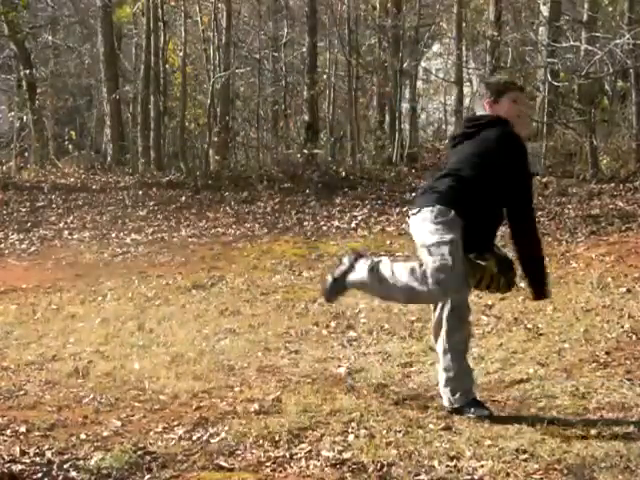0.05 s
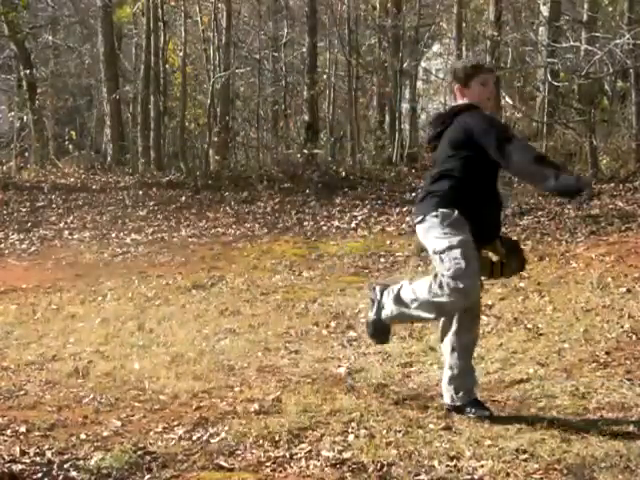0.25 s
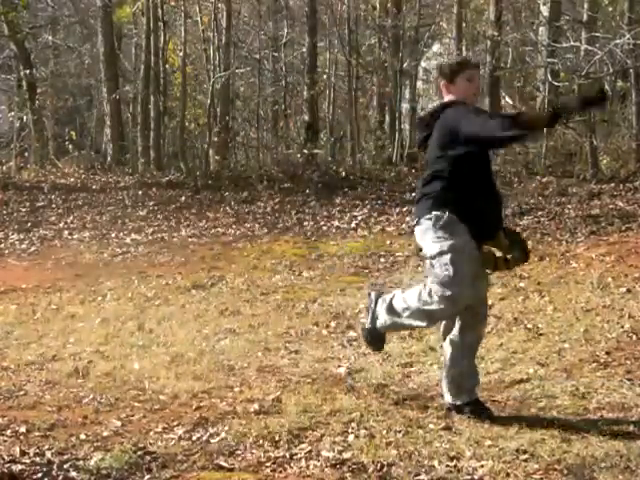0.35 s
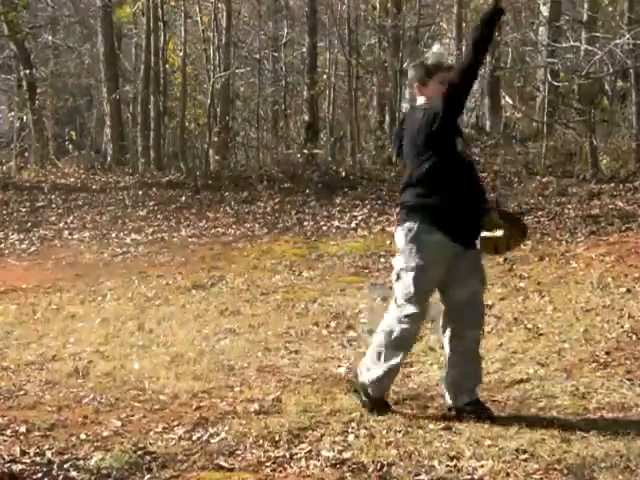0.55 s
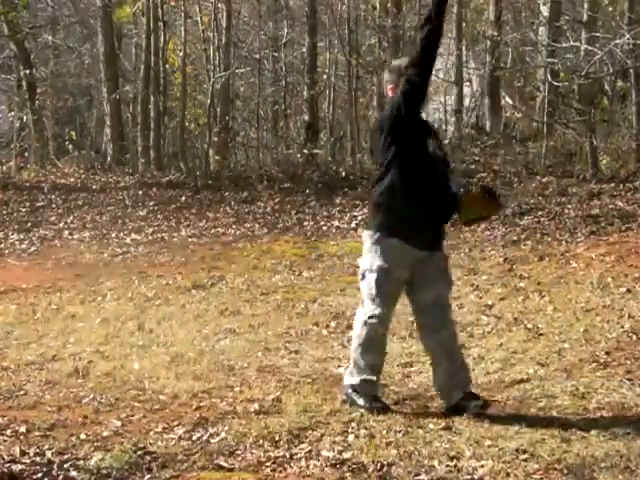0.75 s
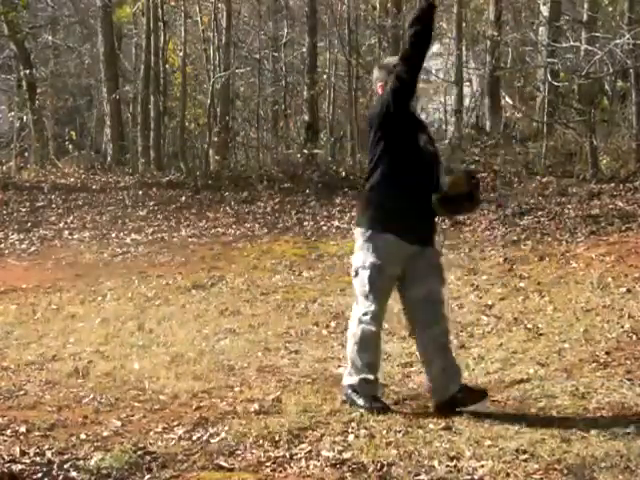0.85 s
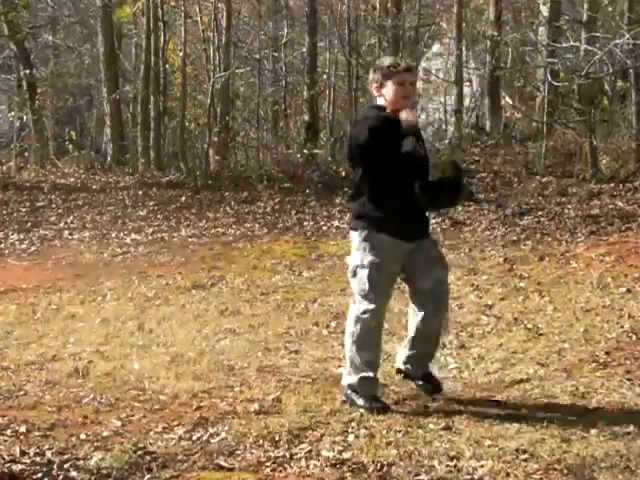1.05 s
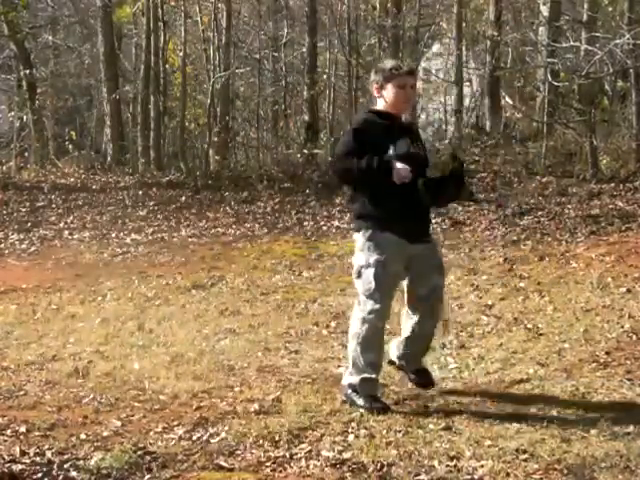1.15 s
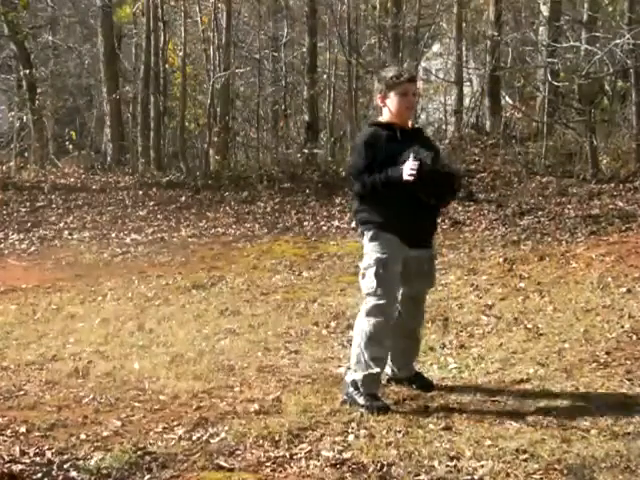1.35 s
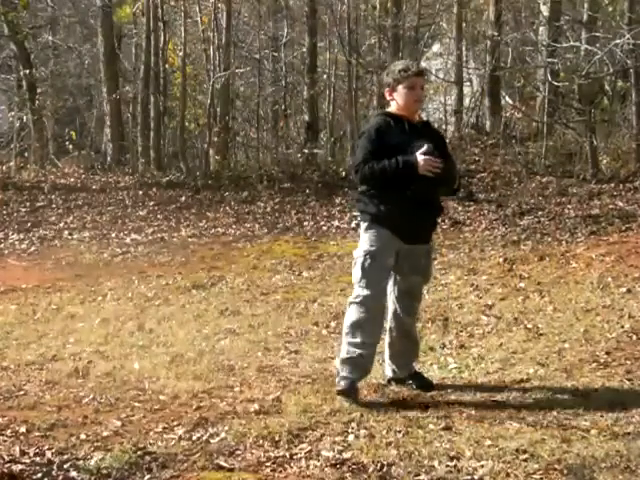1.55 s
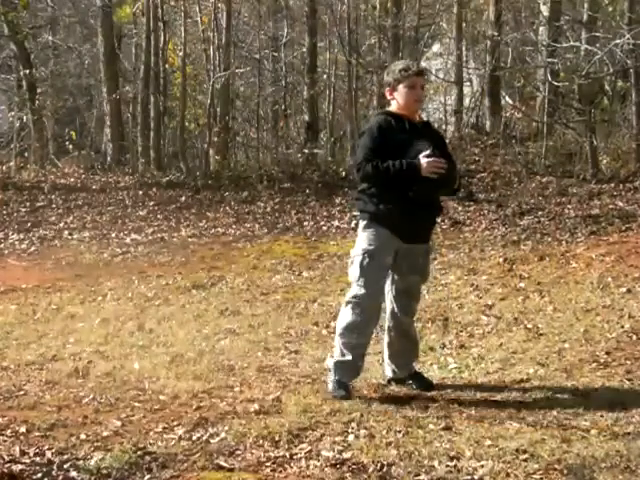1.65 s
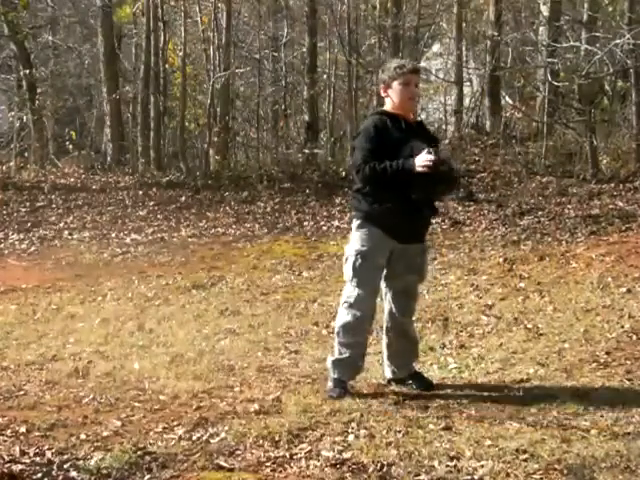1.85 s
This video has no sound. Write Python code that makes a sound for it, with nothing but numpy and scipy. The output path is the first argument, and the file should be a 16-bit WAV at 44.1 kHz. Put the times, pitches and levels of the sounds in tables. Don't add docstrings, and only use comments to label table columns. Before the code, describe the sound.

After a tiny bird chip, a caught ball pops sharply in a leather mitt, close and loud. Bright echoes scatter through woods, then quiet leaf ticks and another chip, over soft distant traffic, picked up by spaced microphones.

```python
import sys
import numpy as np
from scipy import signal
from scipy.fft import rfft, irfft
from scipy.io import wavfile
from scipy.ndimage import uniform_filter1d

SR = 44100
rng = np.random.default_rng(int(sys.argv[2]) if len(sys.argv) > 2 else 0)


def wav_record(signal):
    frames = np.transpose(np.atleast_2d(signal))
    bounded = np.clip(frames, -1, 1)
    quanta = np.round(bounded * 32767).astype(np.int16)
    wavfile.write(sys.argv[1], SR, quanta)


def undo_db(level):
    steps = np.asarray(level, float) / 20
    return 10 ** steps


N = 83790
T = np.arange(N) / SR
SHORT = T[:SR // 6]


def level(x, db):
    return x * undo_db(db) / np.sqrt(np.mean(x ** 2))


def band(x, lo_hz, hi_hz, order=2):
    sos = signal.butter(order, [lo_hz, min(hi_hz, SR / 2.2)], "band", fs=SR, output="sos")
    return signal.sosfilt(sos, x)


def walk(rate):
    k = int(SR / rate)
    held = np.repeat(rng.standard_normal(N // k + 1), k)
    return 1.3 * uniform_filter1d(uniform_filter1d(held, k), k)[:N]


def fade(t, t60):
    return (t >= 0) * np.exp(-np.log(1000) * np.clip(t / t60, 0, 3))


def late(x, s):
    return np.interp(T - s, T, x, left=0)


def add(out, x, s):
    i = int(s * SR)
    out[..., i:i + x.shape[-1]] += x[..., :N - i]


def ports(x, share, lag):
    wide_hz, order, top_hz = 3030, 1.47, 7000
    f = np.arange(N // 2 + 1) * SR / N
    wide = (f / wide_hz) ** order / (1 + (f / top_hz) ** order)
    side = irfft(rfft(x) * (share - 1j * lag * wide), N)
    return np.array([x, side])


# f/Hz, level/dB
AIR_MID_TONE = [(25, -2), (66, 0), (235, -10.5), (492, -18), (800, -22.5), (2100, -33.5), (8530, -45.5),
                (11000, -47)]
AIR_SIDE_TONE = [(25, 7.5), (197, 1.5), (505, -3.5), (1000, -6), (1670, -9.5), (3680, -12), (8970, -17),
                 (11000, -38)]
# t/s, level/dB
RUMBLE_LEVELS = [(0, -51.5), (.2, -57), (.57, -52.5), (.8, -51.5), (1.05, -53), (1.35, -55.5), (1.9, -56.5)]


def air(colour, db, swell):
    swell_db, flicker_db, rumble_hz = .6, 1.2, 404
    f, tone = np.array(colour).T
    s, far = np.array(RUMBLE_LEVELS).T
    rumble = np.interp(T, s, far) - far.mean()
    out = 0
    for hz in 25 * 2 ** np.arange(0, 9, .5):
        unrest = swell_db * swell + flicker_db * walk(9)
        gain_db = np.interp(np.log(hz), np.log(f), tone) + unrest * min(1, (300 / hz) ** 0.55)
        gain_db = gain_db + rumble / (1 + (hz / rumble_hz) ** 2)
        noise = band(rng.standard_normal(N), hz / 1.19, hz * 1.19, order=3)
        out = out + undo_db(gain_db) * noise
    return level(out, db)


# t/s, level/dB, extra side level/dB
CHIPS = [
    (0.12, -68, 9),
    (1.156, -64, 7),
]


def bird():
    top_hz, rise_hz, rise_s = 8050, 2200, .007
    sag_hz_per_s, rough_hz = 30000, 130
    chip_s, tail_db, tail_s = .045, -12, .11
    out, t = np.zeros((2, N)), SHORT
    for s, db, side_db in CHIPS:
        husk = walk(900)[:len(t)]
        hz = top_hz - rise_hz * np.exp(-t / rise_s) - sag_hz_per_s * t + rough_hz * husk
        gate = np.clip(np.minimum(t / .003, 1 - t / chip_s), 0, 1)
        chip = np.sin(2 * np.pi * np.cumsum(hz) / SR) * gate
        scatter = rng.standard_normal((2, len(t))) * np.clip(1 - (t / tail_s) ** 2, 0, 1)
        tail = level(signal.fftconvolve(chip[None], scatter)[:, :len(t)], tail_db)
        both = chip * np.array([[1], [-1]]) + tail
        add(out, undo_db(np.array([[db], [db + side_db]])) * both, s)
    return out


# t/s, length/s, level/dB, centre f/Hz, width ratio
RUSTLES = [
    (0.479, 0.0073, -63, 2000, 1.23),
    (0.528, 0.059, -69, 2580, 2.84),
    (.668, 0.0066, -65, 3120, 1.18),
    (0.924, .035, -67, 1260, 1.47),
    (1.395, 0.0048, -59.5, 1700, 1.5),
    (1.47, 0.0046, -60.5, 2540, 1.33),
    (1.649, 0.095, -64.5, 1980, 2.07),
    (1.733, 0.0055, -55.5, 3020, 1.16),
    (1.797, 0.0053, -64.5, 3300, 2.2),
]


def leaves():
    cracks_per_s, uneven_db = 9000, 2.5
    out, t = np.zeros((2, N)), SHORT
    for s, length, db, hz, ratio in RUSTLES:
        cracks = (rng.random((2, len(t))) < cracks_per_s / SR) * rng.standard_normal((2, len(t)))
        cracks = cracks * undo_db(uneven_db * rng.exponential(size=cracks.shape))
        gate = np.clip(np.minimum(t, length - t) / (0.47 * length), 0, 1)
        ratio = max(ratio, 1.05)
        burst = band(cracks * gate, hz / ratio, hz * ratio, order=3)
        burst = level(burst, db) * np.sqrt(length / t[-1])
        add(out, burst * np.array([[1], [.8]]), s)
    return out


# f/Hz, width ratio, mid level/dB, side level/dB, t60/s
TRUNKS = [(162, 1.424, -53.5, -91, .2), (293, 1.42, -57, -72, 0.083), (597, 1.4, -45.5, -67, 0.54),
          (1110, 1.66, -56, -65, 1.23), (2210, 1.83, -53.5, -68, 0.5), (3135, 1.09, -60.5, -66, 1.62),
          (4620, 1.61, -55, -54.5, 0.52), (6850, 1.126, -61.5, -56, 0.55), (8970, 1.09, -64, -56.5, 0.27)]


def trees():
    pop_s, rise_s, uneven_db = .216, 0.0014, 3
    early_db, early_t60_s = 2, 0.26
    settled = slice(SR // 40, SR // 4)
    out, t = np.zeros((2, N)), T[:SR]
    for hz, ratio, mid_db, side_db, t60 in TRUNKS:
        grains = rng.standard_normal((2, SR)) * undo_db(uneven_db * rng.exponential(size=(2, SR)))
        decay = fade(t, t60) + undo_db(early_db) * fade(t, early_t60_s)
        onset = 1 - np.exp(-(t / rise_s) ** 2)
        ratio = max(ratio, 1.02)
        wet = band(grains * decay * onset, hz / ratio, hz * ratio, order=3)
        wet = wet / wet[:, settled].std(axis=1, keepdims=True)
        add(out, wet * undo_db(np.array([[mid_db], [side_db]])), pop_s)
    return out


ECHO_DELAYS = [.00285, .0100, .0209, .0624, .0873, .1745, .4994]
# level/dB, low edge f/Hz, high edge f/Hz, left share
ECHO_TONES = [
    (-8.5, 92, 1700, 0.089),
    (-17.5, 50, 820, .1),
    (-8, 1800, 7500, 0.076),
    (-25.5, 910, 7100, 0.091),
    (-16, 1900, 3700, 0.065),
    (-12, 3620, 8900, -0.41),
    (-22.5, 3000, 6200, -.12),
]


def echoes(pop):
    out = np.zeros((2, N))
    for s, (db, lo_hz, hi_hz, share) in zip(ECHO_DELAYS, ECHO_TONES):
        out += ports(undo_db(db) * band(late(pop, s), lo_hz, hi_hz), share, .6)
    return out


def ring(x, modes):
    tones = 0
    for hz, db, t60 in modes:
        tones = tones + undo_db(db) * np.cos(2 * np.pi * hz * SHORT) * fade(SHORT, t60)
    return signal.fftconvolve(x, tones)[:N]


TOUCH_TIMES = [
    .21645,
    .2176,
]
# level/dB, push length t/ms
TOUCHES = [
    (-11.5, .22),
    (0, .45),
]
# f/Hz, level/dB, t60/s
POCKET_TONES = [(173, -4, 0.097), (276, 11.5, 0.02), (491, 10, 0.034), (590, 6, 0.015), (694, 8.5, 0.014),
                (1004, -5.5, 0.056), (1643, -14, 0.011)]
# f/Hz, level/dB, t60/s
LACE_TONES = [(3193, -6, 0.027), (3760, 7.5, 0.0027), (4860, -3.5, 0.013), (5580, -3, 0.0047),
              (6130, -3.5, .008), (7850, -11, 0.01), (9940, -46, 0.016)]


def glove():
    pop_db, crack_db, slap_db = -2.5, -23, -27
    crack_late_s, slap_t60_s = 0.00019, 0.0084
    push, crack, slap = np.zeros(N), np.zeros(N), np.zeros(N)
    for s, (db, ms) in zip(TOUCH_TIMES, TOUCHES):
        push += undo_db(db) * np.exp(-((T - s) / ms * 4000) ** 2) / ms
        crack[int((s + crack_late_s) * SR)] = undo_db(db)
        slap += undo_db(db) * fade(T - s, slap_t60_s)
    pocket = band(ring(push, POCKET_TONES), 75, 8000, order=1)
    pocket = pocket / np.abs(pocket).max()
    laces = ring(crack, LACE_TONES)
    slap = slap * band(rng.standard_normal(N), 3370, 7700)
    return undo_db(pop_db) * pocket + undo_db(crack_db) * laces + undo_db(slap_db) * slap


def scene():
    swell = walk(2.5)
    background = np.array([air(AIR_MID_TONE, -50.5, swell), air(AIR_SIDE_TONE, -58, swell)])
    pop = glove()
    direct = ports(pop, 0.095, 1.1)
    mid, side = background + bird() + leaves() + trees() + echoes(pop) + direct
    return np.array([mid + side, mid - side])


def low_pass(x):
    return signal.sosfilt(signal.butter(12, 12140, fs=SR, output="sos"), x)


def record(dry):
    ceiling = 1.05
    rounded = dry / (1 + (dry / ceiling) ** 4) ** 0.24
    roll_off = signal.butter(12, 10800, fs=SR, output="sos")
    return low_pass(signal.sosfilt(roll_off, rounded))


dry = scene()
out = record(dry)
wav_record(out)
```